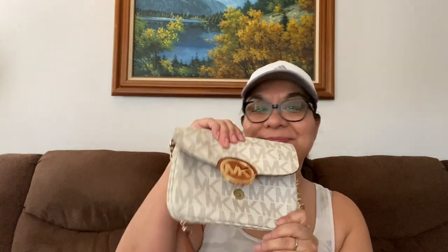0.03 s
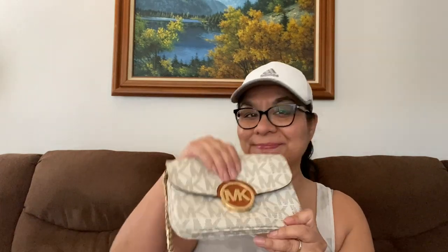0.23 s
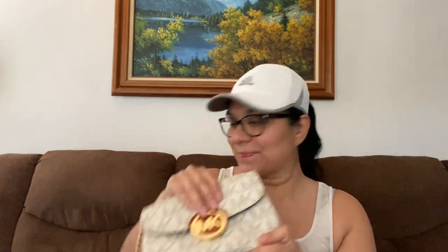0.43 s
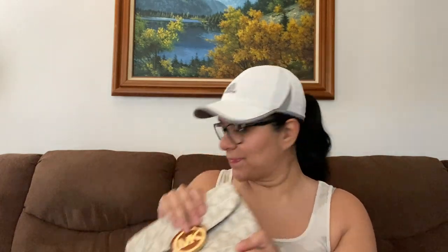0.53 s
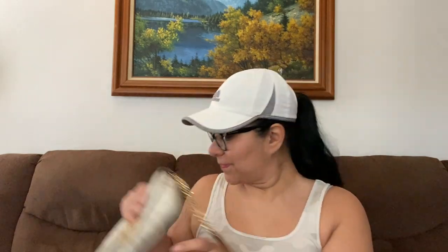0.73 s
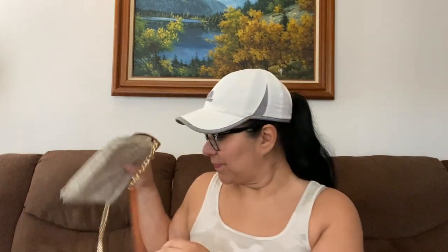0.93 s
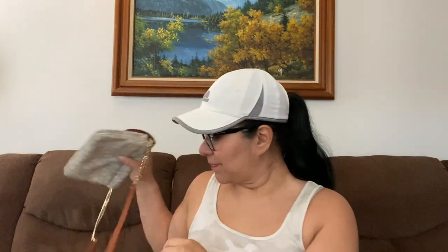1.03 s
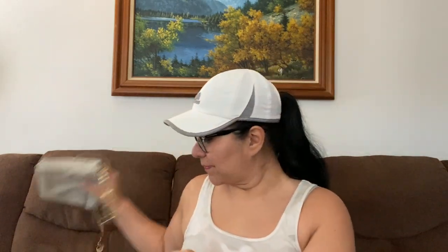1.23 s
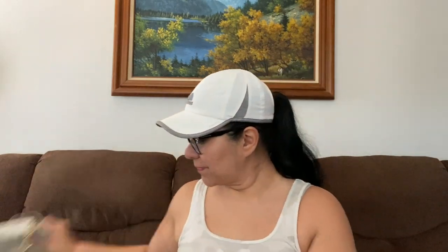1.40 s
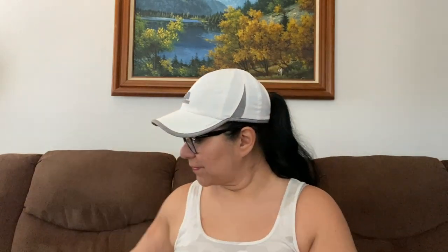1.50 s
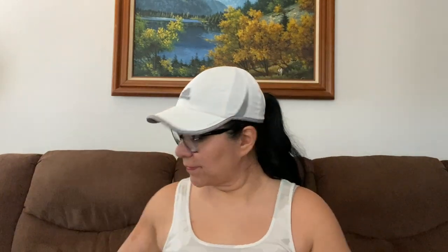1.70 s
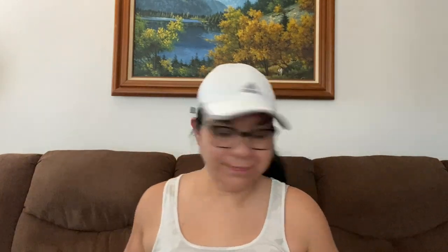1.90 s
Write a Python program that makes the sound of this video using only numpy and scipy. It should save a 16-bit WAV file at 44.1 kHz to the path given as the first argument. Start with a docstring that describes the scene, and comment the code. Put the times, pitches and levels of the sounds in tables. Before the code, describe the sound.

A handbag's metal clasp snaps shut and clicks again, close by in a quiet room. Hands lightly rub the leather, then the chain strap rattles and the bag slides onto a sofa with a soft bump.

```python
"""A handbag's metal clasp snaps shut and clicks once more, close by in a quiet living room.
Each click cracks, rings the metal and thumps the hollow bag. Hands tap and rub the leather.
The chain strap slithers and the fittings rattle as the bag is swung aside; it slides onto
a sofa with a soft bump. Friction is tiny slips over hiss. A low hum fills the room."""
import sys
import numpy as np
from scipy import signal
from scipy.fft import rfft, irfft
from scipy.io import wavfile

SR = 44100
rng = np.random.default_rng(int(sys.argv[2]) if len(sys.argv) > 2 else 0)


def bounce(signal):
    """Save signal as a 16-bit WAV file at the path given by the first command-line argument."""
    frames = np.transpose(np.atleast_2d(signal))
    limited = np.clip(frames, -1, 1)
    pcm = np.round(limited * 32767).astype(np.int16)
    wavfile.write(sys.argv[1], SR, pcm)


N = 85995
T = np.arange(N) / SR
HZ = np.fft.rfftfreq(N, 1 / SR)
LAP_LAG_S, SOFA_LAG_S, SEAT_LAG_S = 0.000088, 0.00026, 0.00054  # right microphone hears later

# Room hum. Each row: frequency in Hz, level in dB.
HUM_LINES = [(96, -63.5), (119, -64), (194, -64), (241, -67), (308, -67.5)]
# Room air. Each row: frequency in Hz, left-right correlation.
AIR_COHERENCE = [(30, 0.78), (120, 0.75), (300, 0.42), (700, 0.11), (1500, 0.069), (15000, 0.081)]
# Reverberation. Each row: frequency in Hz, T60 in seconds.
ROOM_DECAY = [(150, 0.49), (600, 0.46), (2700, 0.35), (5000, 0.37), (9000, 0.3), (12000, 0.21),
              (15000, 0.5)]
# Nearby surfaces. Each row: delay in seconds, gain in dB.
REFLECTIONS = [(.0068, -11.5), (0.0125, -19.5), (0.0153, -19.5)]
# Fingers and fittings. Each row: start in seconds, level in dB, centre in Hz, width in octaves.
TAP_EVENTS = [(0.0393, -47.5, 1100, 0.33), (.111, -44, 1137, 0.5), (0.1277, -34, 1310, 1.02),
              (0.3058, -24.5, 10200, 0.14), (0.8956, -47.5, 5500, 0.46), (.982, -46.5, 2380, 0.19),
              (0.982, -52.5, 14400, .15), (1.075, -52, 9360, 0.11), (1.293, -20.5, 4800, 0.55),
              (1.329, -24, 8950, 0.7), (1.365, -54, 14300, 0.22), (1.489, -38, 13500, 0.58),
              (1.5046, -26, 11600, 0.67), (1.593, -20, 2500, 2.2), (1.805, -32.5, 8900, 2.5)]
# Clasp clicks. Each row: start in seconds, crack, thud and room levels in dB,
# room tilt in dB per octave, left over right in dB.
CLASP_CLICKS = [(.2266, -8, -28, -8, 0, -2.5), (.3066, -15.5, -39.5, -18, -0.1, 1)]
# Short clack of the catch, then faint ring of its plate. Each row: frequency in Hz,
# T60 in seconds, snap level in dB, second click level in dB.
CLASP_MODES = [(900, 0.006, -40, -51), (1230, 0.01, -24.5, -26), (1538, 0.016, -36, -33),
               (1980, 0.02, -24, -43.5), (2170, 0.019, -16, -53.5), (2540, 0.011, -7.5, -48),
               (2856, 0.0072, -23, -16), (3660, .011, -17, -24.5), (4995, 0.018, -26, -24.5),
               (6050, 0.0088, -18, -15.5), (9040, 0.004, -9.5, -24), (10070, .003, -26.5, -14),
               (2125, 0.4, -46, -66), (2560, 0.36, -41.5, -61.5), (2760, .33, -41.5, -53.5),
               (3044, .18, -42.5, -49), (4310, 0.4, -42, -65.5)]
# Hollow bag. Each row: frequency in Hz, T60 in seconds, level in dB.
BAG_MODES = [(151.2, 0.041, -6), (221, 0.078, -7.5), (292, 0.025, -3), (443, 0.031, 3), (853, 0.026, -0.5),
             (1130, 0.074, -12.5)]

# Friction strokes. Each row: peak time, rise and fall in seconds, level in dB, tilt in dB per octave.
RUB_STROKES = [(.135, 0.034, 0.036, -56, 1.5), (.19, 0.022, 0.032, -53.5, 2), (.5, 0.032, 0.024, -62, 6.5),
               (.67, 0.12, 0.12, -73.5, 2), (.978, 0.017, 0.0091, -67, 0.5),
               (1.078, 0.0096, 0.038, -56.5, -2.5), (1.208, 0.011, 0.026, -55.5, -4),
               (1.52, 0.031, 0.0094, -60, -3), (1.81, 0.059, 0.063, -59.5, 6), (1.92, 0.017, 0.048, -66, 6)]
SIZZLE_STROKES = [(.18, 0.045, 0.073, -58.5, -7), (.5, 0.07, 0.032, -64.5, 1), (.67, 0.1, 0.054, -63, -8),
                  (.79, 0.041, 0.029, -60, 4), (.982, 0.013, 0.017, -68.5, 9),
                  (1.07, 0.004, 0.015, -67, -2.5), (1.288, 0.0076, 0.011, -32, 2),
                  (1.47, 0.047, 0.034, -82, 8), (1.585, 0.022, 0.032, -36.5, -5.5),
                  (1.78, 0.047, .06, -64, -4)]
SLITHER_STROKES = [(1.279, 0.0048, 0.0086, -40.5, 2.5), (1.295, 0.012, 0.029, -35, -0.55)]
RATTLE_STROKES = [(1.287, 0.0087, 0.0089, -42.5, -2), (1.517, 0.0032, .01, -49, -9),
                  (1.547, 0.0089, 0.019, -49, -6), (1.606, 0.0097, 0.015, -41.5, 2)]
BUMP_STROKES = [(1.307, 0.015, 0.038, -50, 0), (1.55, 0.069, 0.075, -48, 1),
                (1.605, 0.071, 0.094, -49, 1.5)]
THUD_STROKES = [(1.52, 0.0081, 0.01, -49, -2), (1.603, 0.021, 0.031, -36, -2.5)]
SLIDE_STROKES = [(1.55, 0.062, 0.016, -51.5, 5), (1.577, 0.016, 0.01, -37, -2.4),
                 (1.602, .018, 0.022, -32.5, -1)]

# Spectra of sources and paths. Each row: frequency in Hz, relative level in dB.
AIR_SPECTRUM = [(10, -39), (25, -26), (45, -6.5), (100, -7), (260, -5.5), (320, -3.5), (420, -13),
                (520, -19.5), (620, -13.5), (1000, -28.5), (1500, -35), (2200, -35.5), (4000, -45.5),
                (6700, -50), (9900, -44.5), (12800, -57), (15500, -47.5)]
LEATHER_SPECTRUM = [(100, -2), (400, 8), (1200, 4), (1800, -1), (2400, 0.5), (3800, -7.5), (6000, -14.5),
                    (10000, -23), (16000, -40.5)]
SIZZLE_SPECTRUM = [(3000, -31), (6000, -15), (9000, 2), (11500, -4), (12700, -16), (14000, 0.5),
                   (15500, 0.5)]
CRACK_SPECTRUM = [(100, -38.5), (600, -29.5), (1500, -17), (3000, -11), (4200, 6), (7000, -5.5), (10000, 9),
                  (12000, -2), (13500, -4.5), (16000, -1.5)]
SEND_SPECTRUM = [(100, -20.5), (250, -19.5), (460, -4.5), (650, -10), (850, -7.5), (1100, -11.5),
                 (1600, -14), (1950, -7.5), (2300, -7.5), (2700, -1), (3300, -8.5), (3900, -10.5),
                 (4600, -7.5), (5300, -13.5), (6000, -10.5), (7300, -19.5), (9500, -14), (11500, -20),
                 (13000, -29), (14500, -28), (16000, -37)]  # clasp into the room
ECHO_SPECTRUM = [(200, -6), (3000, -1), (7000, -2), (11000, -8), (15000, -23.5)]
CHAIN_SPECTRUM = [(100, -1), (350, -3), (600, 1), (780, 6.5), (1000, 1.5), (1800, 5.5), (2400, 5),
                  (2900, 0.5), (3700, 6), (5000, 3), (6200, 2), (7300, -0.5), (9500, 7), (12500, -5),
                  (15000, -5.5)]
FITTINGS_SPECTRUM = [(1000, -35), (1400, -32), (1550, -1), (1700, -22), (3800, -15), (4250, -1), (4550, -4),
                     (5100, -10), (8000, -33)]
CUSHION_SPECTRUM = [(25, -18), (50, 0), (150, -2), (280, -13), (550, -10), (900, -14.5), (2500, -40)]
SEAT_SPECTRUM = [(200, -26), (300, -6.5), (355, -1), (420, -22), (515, -0.5), (590, -6), (700, -20),
                 (1500, -26)]
SOFA_SPECTRUM = [(88, -26), (150, -9), (250, -10), (350, -5.5), (519, -4.5), (780, -6.5), (860, -12),
                 (1020, -4), (1290, -11), (1510, -7), (1830, -7), (4480, -15.5), (5330, -18.5),
                 (9000, -18.5), (12500, -27), (15500, -28.5)]


def amp(db):
    """Decibels to gain."""
    return 10 ** (np.asarray(db) / 20)


def unit_rms(x):
    """Scale to rms 1."""
    return x / np.sqrt(np.mean(x ** 2) + 1e-20)


def curve(points, hz=HZ):
    """Interpolate on a log-frequency axis."""
    knots_hz, values = np.transpose(points)
    return np.interp(np.log(hz + 1), np.log(knots_hz + 1), values)


def colour(x, gain_db):
    """Filter by a curve over HZ."""
    return irfft(rfft(x) * amp(gain_db), N)


def delay(x, lag_s):
    """Fractional-sample delay."""
    hz = np.fft.rfftfreq(2 * N, 1 / SR)
    return irfft(rfft(x, 2 * N) * np.exp(-2j * np.pi * hz * lag_s))[:N]


def pair(x, lag_s):
    """Stereo pair, right channel late."""
    return np.array([x, delay(x, lag_s)])


def balance(left_db):
    """Stereo gains, left over right."""
    return amp([[left_db / 2], [-left_db / 2]])


def blend(shared, own, coherence):
    """Equal-power mix of two noises, per frequency."""
    return irfft(rfft(shared) * coherence + rfft(own) * np.sqrt(1 - coherence ** 2), N)


def pulse(spectrum_db):
    """Minimum-phase click of peak 1."""
    cepstrum = irfft(np.log(amp(np.maximum(spectrum_db, -70))), N)
    cepstrum[1:N // 2] *= 2
    cepstrum[N // 2:] = 0
    click = irfft(np.exp(rfft(cepstrum)), N)
    return click / abs(click).max()


def ring(modes, attack_s):
    """Damped sines with a linear attack."""
    t = T[:SR // 4]
    sines = sum(amp(db - 60 * t / t60_s) * np.sin(2 * np.pi * hz * t) for hz, t60_s, db in modes)
    return np.pad(sines, (0, N - len(t))) * np.minimum(T / attack_s, 1)


def reverb(x, gap_s=0.0018, build_s=0.014, mono_hz=300):
    """Diffuse stereo tail: decay per band, coherent only in the bass."""
    hz, t, (left, own) = signal.stft(rng.standard_normal((2, SR)), SR, nperseg=256)
    coherence = np.exp(-(hz[:, None] / mono_hz) ** 2)
    right = coherence * left + np.sqrt(1 - coherence ** 2) * own
    t60_s = curve(ROOM_DECAY, hz)[:, None]
    bands = np.array([left, right]) * amp(-60 * t / t60_s) / np.sqrt(t60_s)
    tail = signal.istft(bands, SR, nperseg=256)[1][:, :SR]
    tail *= np.clip((T[:SR] - gap_s) / build_s, 0, 1)
    return signal.fftconvolve(x[None], tail / np.linalg.norm(tail[0]), axes=1)[:, :N]


def ripple_db(depth_db=2.5, spacing_hz=155.1):
    """Random spectral peaks and dips from nearby surfaces."""
    knots_hz = np.arange(0, SR, spacing_hz)
    return depth_db * np.interp(HZ, knots_hz, rng.standard_normal(N)[:len(knots_hz)])


def friction(strokes, spectrum, lag_s, slips_per_s, slip_db, wet_db, left_db, split_hz, spread_db=13):
    """Strokes of tiny slips over hiss; channels independent above split_hz."""
    sizes = amp(spread_db * rng.random((2, N)) ** 2) * rng.choice([-1, 1], (2, N))
    slips = sizes * (rng.random((2, N)) < slips_per_s / SR)
    left, own = rng.standard_normal((2, N)) + amp(slip_db) * unit_rms(slips)
    coherence = 1 / np.sqrt(1 + (HZ / split_hz) ** 4)
    noise = np.array([left, blend(delay(left, lag_s), own, coherence)])
    shape_db, octaves = curve(spectrum), np.log2((HZ + 50) / 1000)
    out = np.zeros((2, N))
    for peak_s, rise_s, fall_s, db, tilt_db_per_oct in strokes:
        age_s = T - peak_s
        envelope = np.exp(-(np.minimum(age_s, 0) / rise_s) ** 2 - np.maximum(age_s, 0) / fall_s)
        texture = colour(noise, shape_db + tilt_db_per_oct * octaves + ripple_db())
        out += amp(db) * envelope * unit_rms(texture)
    return out * balance(left_db) + amp(wet_db) * reverb(out[0])


def room_air(level_db=-56):
    """Steady low noise, most coherent in the bass."""
    left, own = rng.standard_normal((2, N))
    noise = np.array([left, blend(left, own, curve(AIR_COHERENCE))])
    return amp(level_db) * unit_rms(colour(noise, curve(AIR_SPECTRUM))) * balance(left_db=-0.5)


def room_hum(waver=0.87, waver_hz=6):
    """Low tones wavering in level and phase."""
    out, lowpass = np.zeros(N), np.exp(-(HZ / waver_hz) ** 2)
    for hz, db in HUM_LINES:
        swell, drift = unit_rms(irfft(rfft(rng.standard_normal((2, N))) * lowpass, N))
        tone = np.sin(2 * np.pi * (hz * T + rng.random()) + waver * drift)
        out += amp(db) * unit_rms((1 + waver * swell / 2) * tone)
    return out


def taps(wet_db=-9, swing_s=(0.37, 1.15)):
    """Dead clicks of fingers, rings and links, moving aside with the bag."""
    out = np.zeros((2, N))
    for start_s, db, centre_hz, width_oct in TAP_EVENTS:
        octaves = np.log2((HZ + 1) / centre_hz)
        tick = pulse(-40 * np.log10(1 + (octaves / width_oct) ** 2 / 2))
        lag_s = np.interp(start_s, swing_s, [LAP_LAG_S, SOFA_LAG_S])
        out += amp(db) * pair(delay(tick, start_s), lag_s)
    return out + amp(wet_db) * reverb(out[0])


def leather_rub():
    """Hands slip over the leather."""
    return friction(RUB_STROKES, LEATHER_SPECTRUM, LAP_LAG_S,
                    slips_per_s=2200, slip_db=-2, wet_db=-3.5, left_db=4, split_hz=2800)


def chain_sizzle():
    """Faint treble of the moving chain."""
    return friction(SIZZLE_STROKES, SIZZLE_SPECTRUM, LAP_LAG_S,
                    slips_per_s=1500, slip_db=5, wet_db=-11, left_db=0.5, split_hz=15000)


def clasp(seating_s=0.00039, thud_lag_s=0.002):
    """The catch cracks and rings as it seats; bag and room answer late."""
    crack, send = pulse(curve(CRACK_SPECTRUM)), pulse(curve(SEND_SPECTRUM))
    octaves = np.log2((HZ + 50) / 3000)
    out = np.zeros((2, N))
    for k, (start_s, crack_db, thud_db, room_db, tilt_db_per_oct, left_db) in enumerate(CLASP_CLICKS):
        metal = ring([(hz, t60_s, levels_db[k]) for hz, t60_s, *levels_db in CLASP_MODES], seating_s)
        thud = amp(thud_db) * ring(BAG_MODES, attack_s=thud_lag_s)
        direct = delay(metal + amp(crack_db) * crack, start_s) + delay(thud, start_s + thud_lag_s)
        echoes = sum(amp(db) * delay(direct, lag_s) for lag_s, db in REFLECTIONS)
        near = direct + colour(echoes, curve(ECHO_SPECTRUM))
        tail = reverb(colour(delay(send, start_s), tilt_db_per_oct * octaves))
        out += pair(near, LAP_LAG_S) * balance(left_db) + amp(room_db) * tail
    return out


def strap_slither():
    """The chain strap slides as the bag swings aside."""
    return friction(SLITHER_STROKES, CHAIN_SPECTRUM, SOFA_LAG_S,
                    slips_per_s=3000, slip_db=0, wet_db=-7, left_db=2.5, split_hz=2700)


def fittings_rattle():
    """Metal fittings shake as the bag is swung and lowered."""
    return friction(RATTLE_STROKES, FITTINGS_SPECTRUM, SOFA_LAG_S,
                    slips_per_s=530, slip_db=5, wet_db=-3, left_db=3, split_hz=4500)


def cushion_bump():
    """Soft bass bumps of the cushion."""
    return friction(BUMP_STROKES, CUSHION_SPECTRUM, SOFA_LAG_S,
                    slips_per_s=300, slip_db=-0.5, wet_db=-19, left_db=1, split_hz=7000)


def seat_thud():
    """The bag touches the seat, then its weight lands."""
    return friction(THUD_STROKES, SEAT_SPECTRUM, SEAT_LAG_S,
                    slips_per_s=430, slip_db=-3, wet_db=-11.5, left_db=0, split_hz=840)


def sofa_slide():
    """The bag drags over the sofa."""
    return friction(SLIDE_STROKES, SOFA_SPECTRUM, SOFA_LAG_S,
                    slips_per_s=2500, slip_db=1, wet_db=-5, left_db=3, split_hz=1670)


def scene():
    """Stereo sum of bag, sofa and room."""
    handling = clasp() + taps() + leather_rub() + chain_sizzle() + strap_slither()
    landing = sofa_slide() + fittings_rattle() + seat_thud() + cushion_bump()
    return handling + landing + room_air() + room_hum()


def record(dry, low_cut_hz=35, high_cut_hz=16250):
    """Microphone low cut, then band limit."""
    highpass = signal.butter(4, low_cut_hz, "high", fs=SR, output="sos")
    lowpass = signal.firwin(301, high_cut_hz, window=("kaiser", 9), fs=SR)
    return signal.oaconvolve(signal.sosfilt(highpass, dry), lowpass[None], "same")


dry = scene()
out = record(dry)
bounce(out)
```